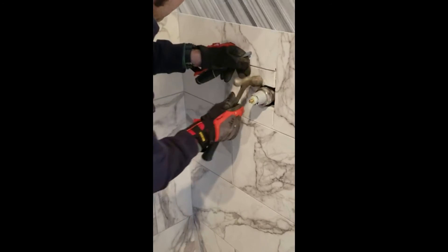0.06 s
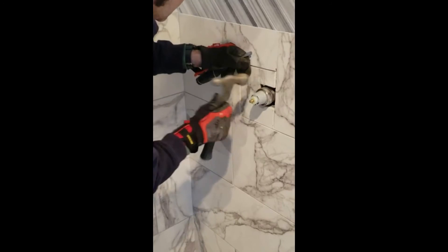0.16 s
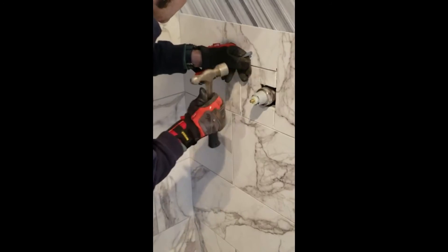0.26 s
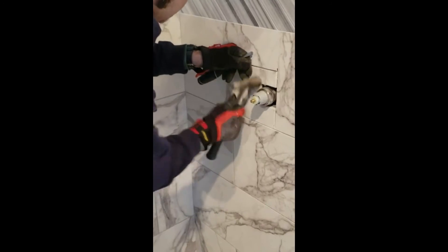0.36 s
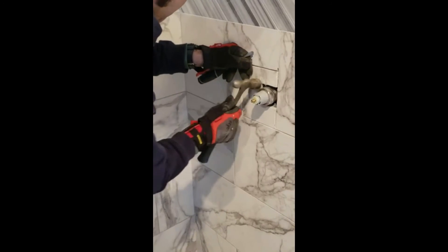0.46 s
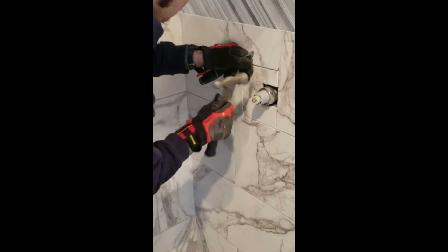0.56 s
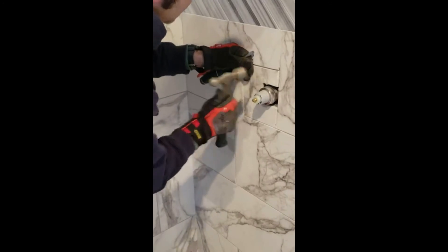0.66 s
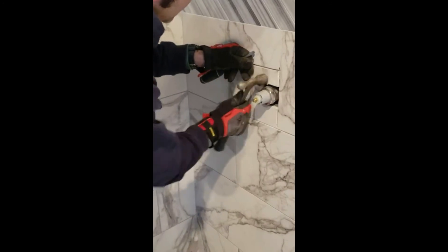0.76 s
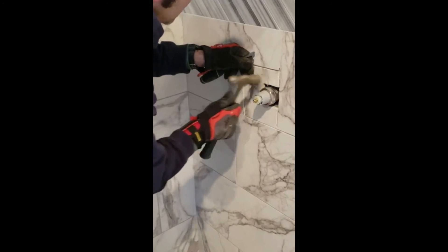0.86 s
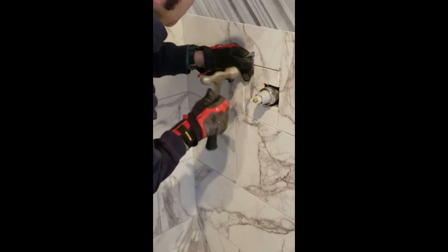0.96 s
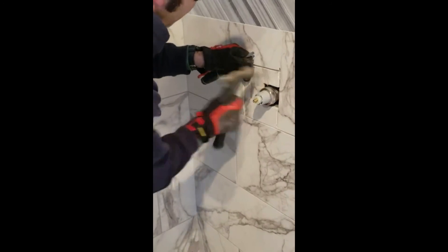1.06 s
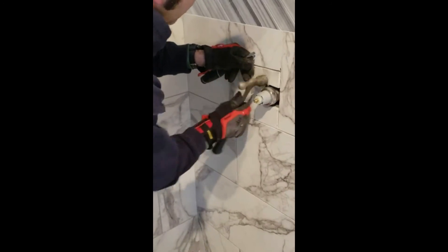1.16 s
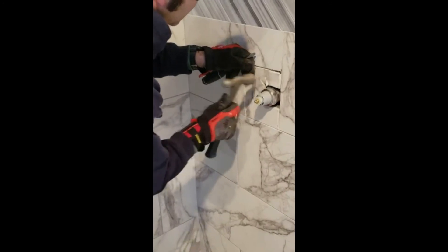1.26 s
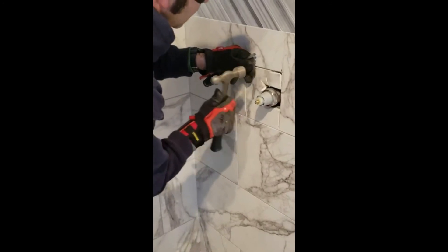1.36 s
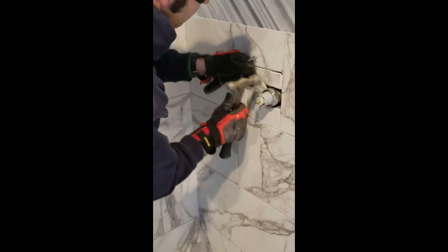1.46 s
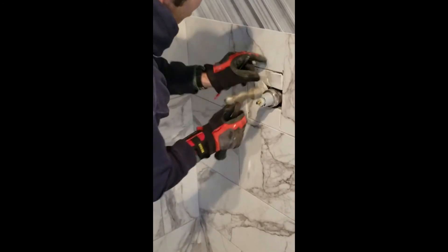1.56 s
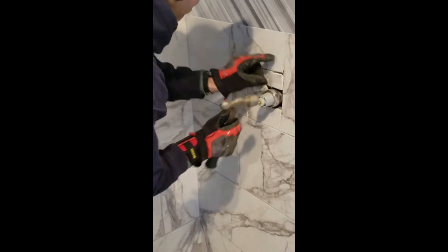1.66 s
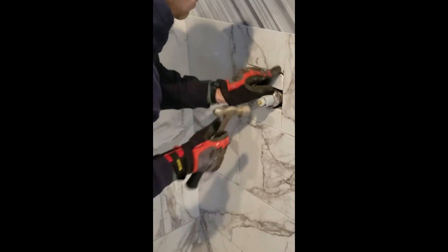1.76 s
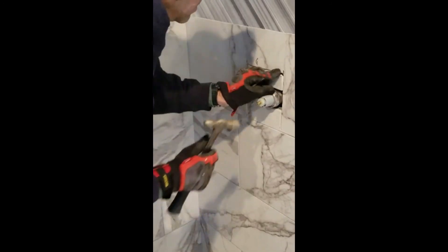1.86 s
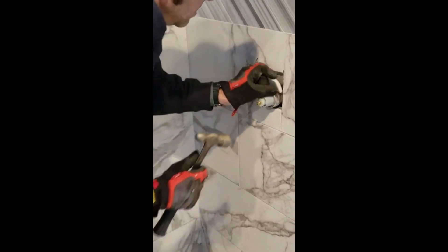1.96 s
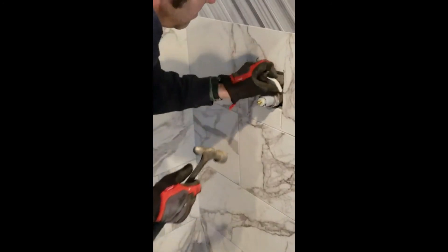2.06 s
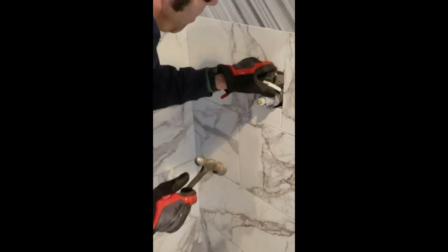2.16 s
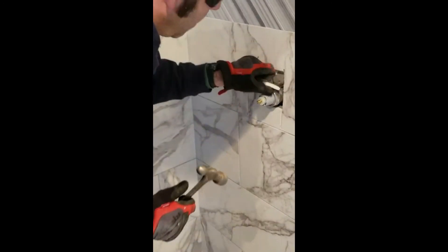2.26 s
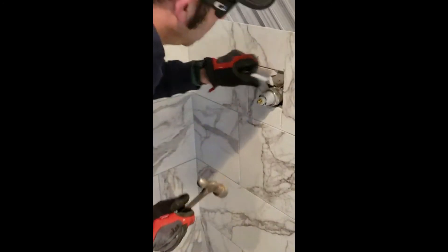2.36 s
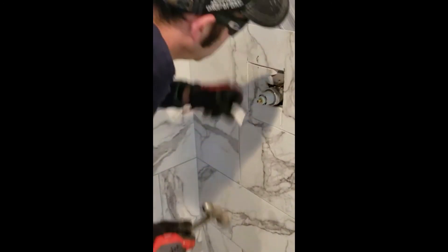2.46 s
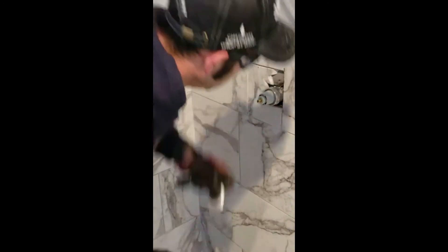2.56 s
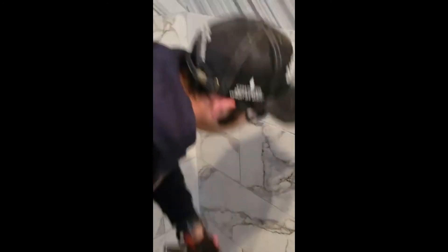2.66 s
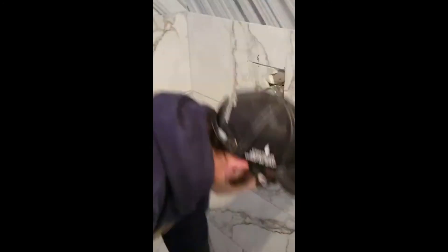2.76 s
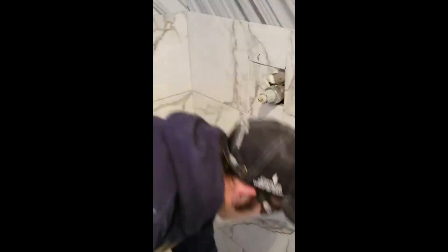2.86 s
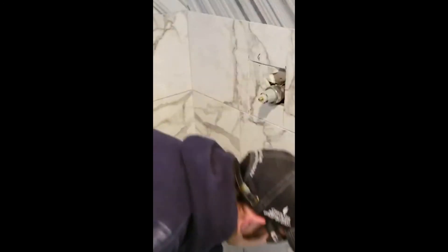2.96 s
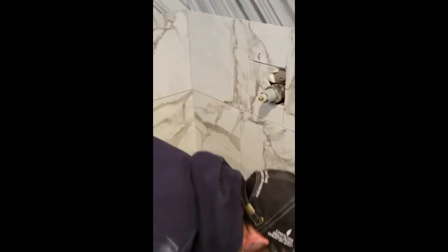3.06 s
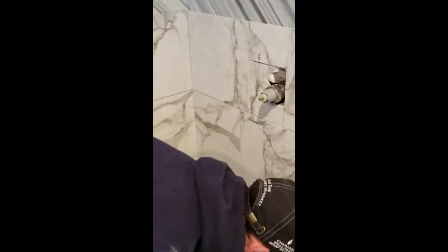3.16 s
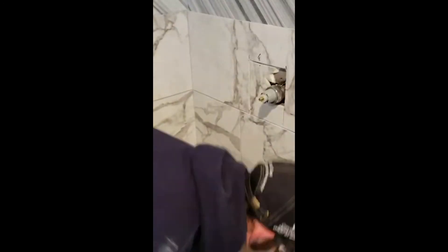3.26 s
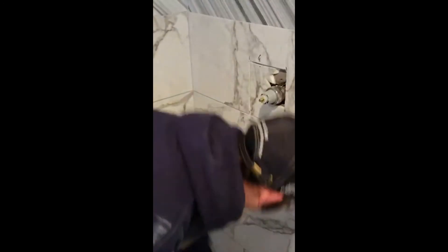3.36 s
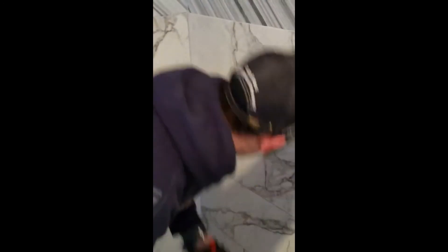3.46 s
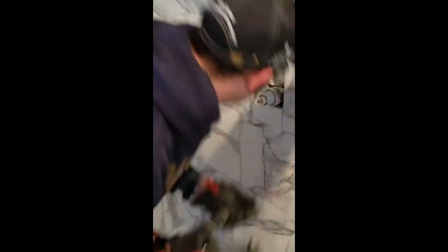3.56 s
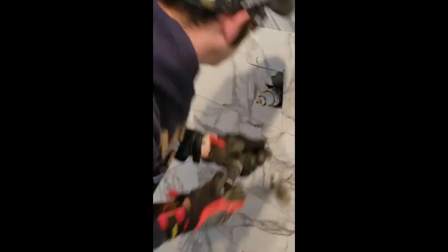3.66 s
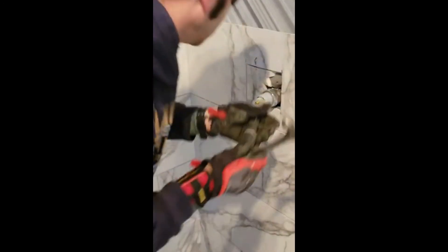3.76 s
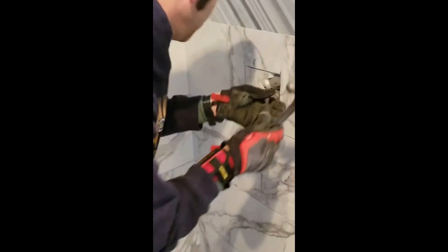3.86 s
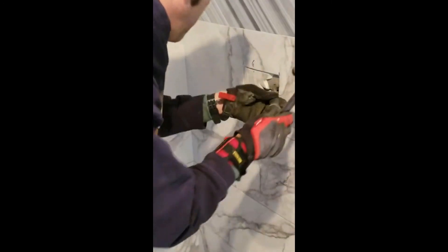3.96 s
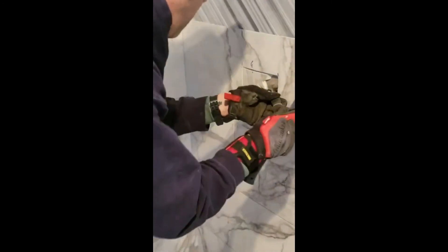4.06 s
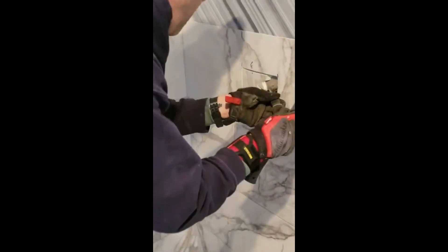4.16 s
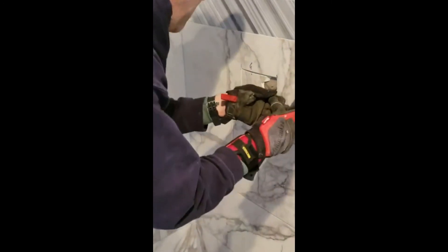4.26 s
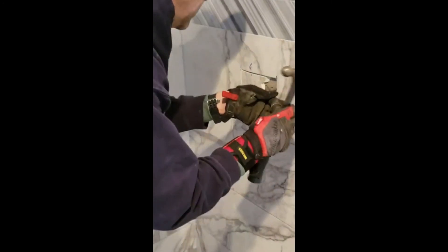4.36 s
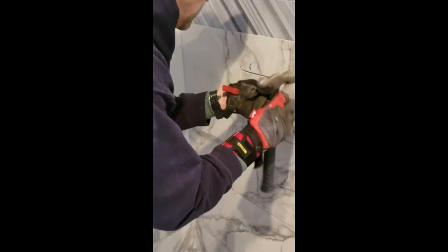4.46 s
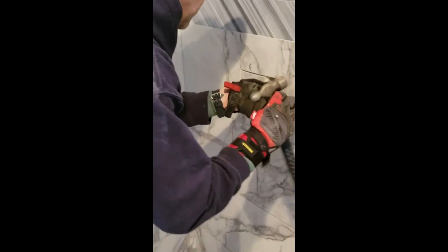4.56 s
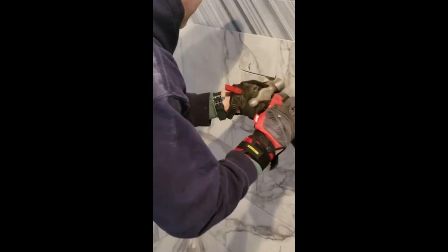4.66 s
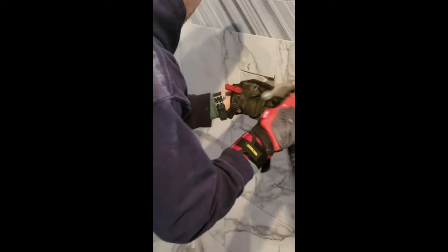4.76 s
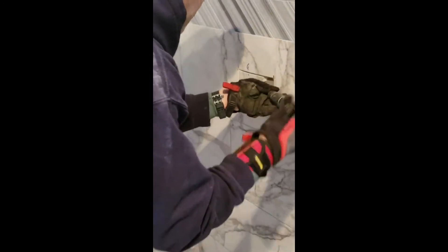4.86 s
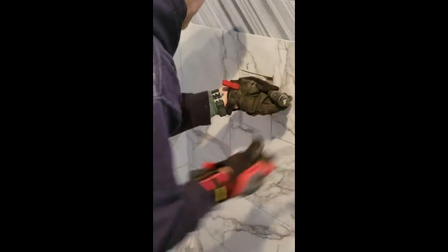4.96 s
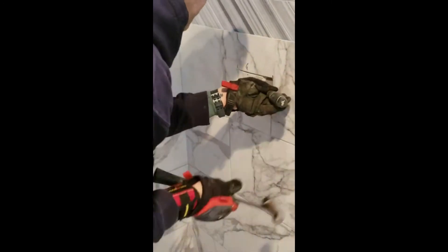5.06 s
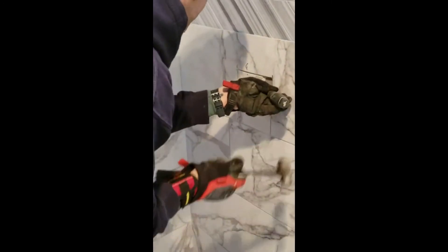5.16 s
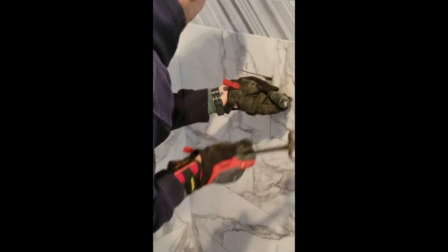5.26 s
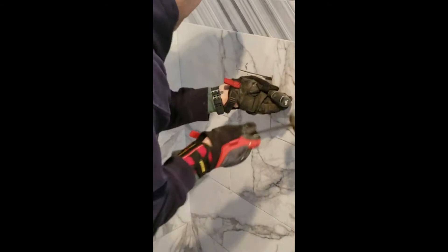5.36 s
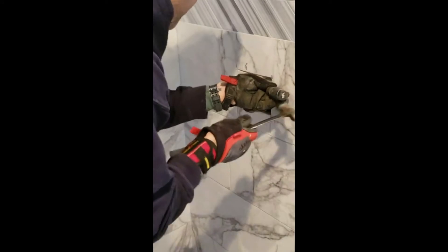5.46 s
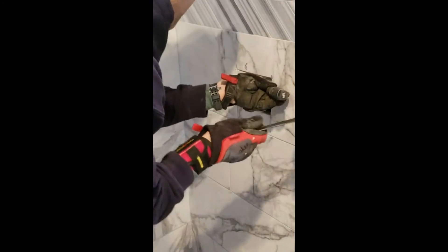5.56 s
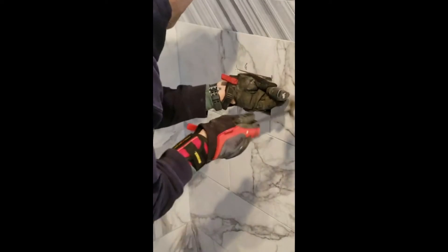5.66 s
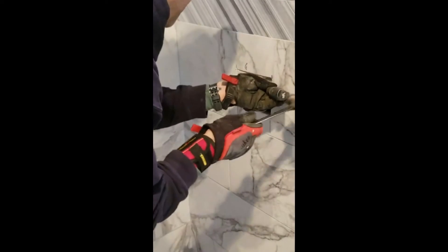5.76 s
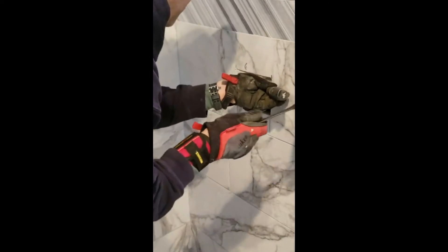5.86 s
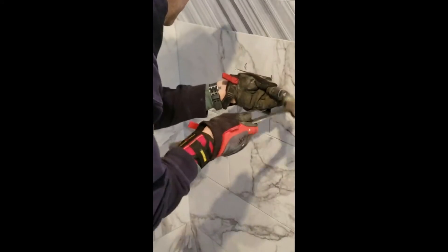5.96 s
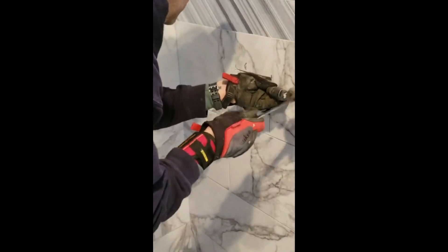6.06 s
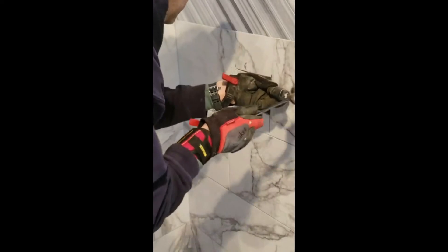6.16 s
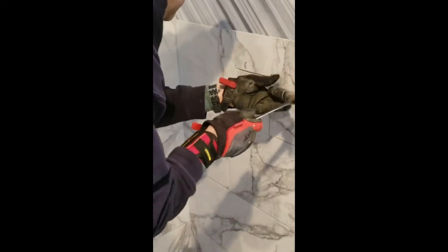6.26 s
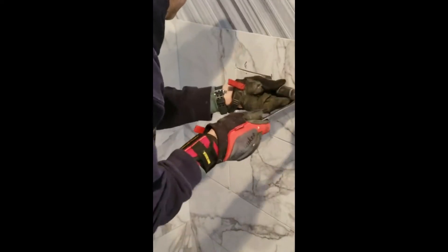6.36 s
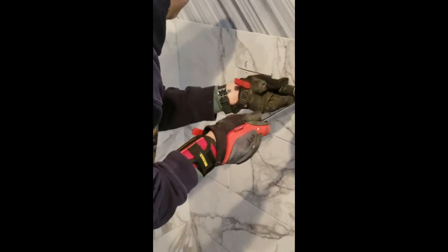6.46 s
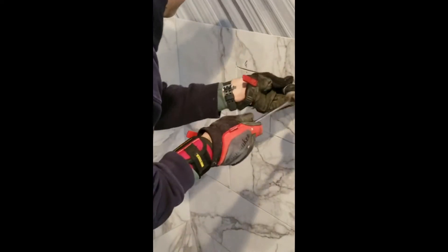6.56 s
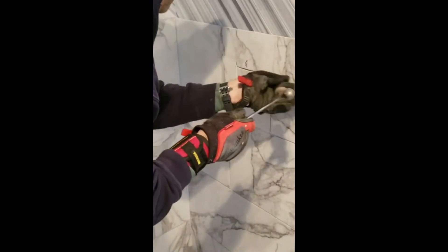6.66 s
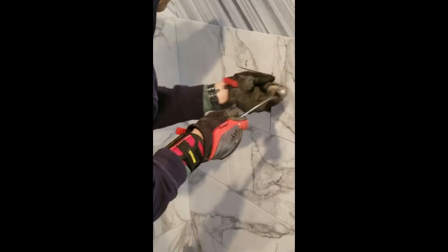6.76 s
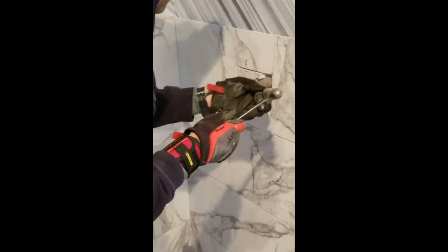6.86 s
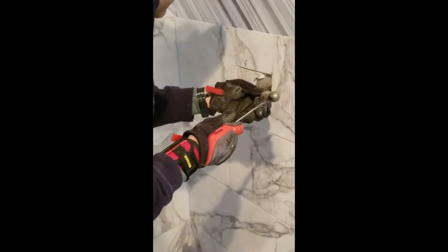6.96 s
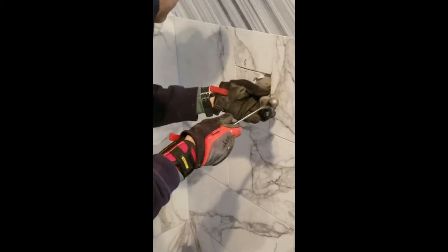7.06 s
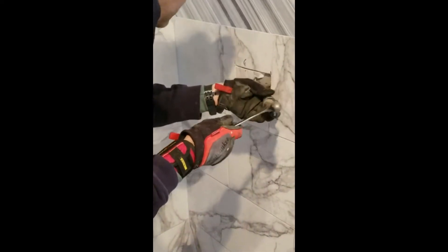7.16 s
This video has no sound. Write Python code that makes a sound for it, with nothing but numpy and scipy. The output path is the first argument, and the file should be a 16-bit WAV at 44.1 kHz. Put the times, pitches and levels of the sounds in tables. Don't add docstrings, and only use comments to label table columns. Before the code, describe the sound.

A close stereo microphone catches evenly spaced, loud chisel blows on wall tile, each sharp and gritty with a deep hollow boom and bright room reverberation. A pause brings falling chips, scraping gloves, soft bumps and a bouncing steel tool with a thin high ring. After tentative taps, quicker blows of varying strength sound looser and more resonant, ending in crisp chip cracks.

```python
import sys
import numpy as np
from scipy import signal
from scipy.io import wavfile
from scipy.ndimage import uniform_filter1d

SR = 44100
rng = np.random.default_rng(int(sys.argv[2]) if len(sys.argv) > 2 else 0)


def master_out(mix):
    frames = np.transpose(np.atleast_2d(mix))
    ceiling = np.clip(frames, -1, 1)
    pcm = np.round(ceiling * 32767).astype(np.int16)
    wavfile.write(sys.argv[1], SR, pcm)


def volts_from_decibels(level):
    exponent = np.asarray(level, float) / 20
    return 10 ** exponent


N = 317520
LEAD = SR // 2
STEP = 64

# (time [s], knock [dB], wall boom [dB], board [dB], tile pitch [Hz])
FIRST_RUN = [
    (-0.18, -10, -26, -23, 1300),
    (0.1165, -5.5, -19, -17, 1347),
    (0.4872, -6, -18.5, -17, 1298),
    (0.8415, -8.5, -18, -16.5, 1370),
    (1.2155, -8.5, -18, -17, 1187),
]
SECOND_RUN = [
    (5.483, -22.5, -36.5, -33.5, 1420),
    (5.783, -7, -17.5, -29, 1355),
    (6.042, -17.5, -30, -36, 1914),
    (6.046, -13.5, -17, -25, 1179),
    (6.295, -14, -18.5, -23, 1226),
    (6.633, -19, -32.5, -42, 1359),
]
# (time [s], knock [dB], board [dB], crack [dB], tile pitch [Hz])
TAPS = [
    (4.398, -44, -44.5, -63, 1434),
    (4.672, -34.5, -42.5, -54, 1388),
    (4.77, -43, -49, -36.5, 1464),
    (5.058, -56, -60, -33.5, 1286),
    (5.279, -61, -70, -47, 1613),
    (6.87, -42, -45, -38.5, 1530),
    (7.118, -45, -63, -32.5, 1232),
    (7.136, -38.5, -43.5, -33, 1325),
]
# (time [s], knock [dB], board [dB], crack [dB], wall boom [dB])
BUMPS = [
    (2.83, -59.5, -71, -54, -51),
    (2.913, -31.5, -44, -31, -32.5),
    (2.969, -38, -61.5, -33, -54.5),
    (3.845, -59, -78, -52, -45),
    (4.105, -33, -46, -38, -48.5),
    (4.135, -53.5, -38, -68, -22.5),
    (4.302, -72, -73, -66, -38),
    (5.433, -44, -63.5, -48, -69),
    (5.459, -59, -51, -55, -60),
    (6.448, -36.5, -45, -25, -46),
]
# (time [s], crack [dB], tick [dB])
CHIPS = [(0.843, -13, -16), (1.217, -26, -17), (1.9707, -40.5, -26), (1.9729, -33.5, -24.5),
         (1.978, -42, -31), (2.139, -49, -31), (2.144, -56, -41), (2.266, -51, -44.5), (2.272, -57, -39),
         (2.38, -57, -44), (2.436, -60, -44), (2.834, -41.5, -45), (3.167, -47, -60), (3.182, -47, -55.5),
         (3.224, -53, -50), (4.246, -58, -23), (4.589, -32.5, -49), (4.672, -31.5, -43), (4.771, -41, -53),
         (5.433, -47, -52), (6.043, -10, -9), (6.871, -50, -45), (7.118, -29, -30), (7.1414, -4.5, -27),
         (7.1429, -19, -5.5), (7.1448, -25, -16)]
# (time [s], thud [dB], clatter [dB])
DROP_BOUNCES = [(3.263, -33, -16.5), (3.268, -45, -14.5), (3.276, -31, -7), (3.2803, -36, -12),
                (3.289, -27.5, -43.5), (3.3, -25, -38), (3.398, -36, -18), (3.402, -36.5, -11),
                (3.409, -36, -24.5), (3.416, -30.5, -36), (3.486, -40, -39.5)]
# (time [s], level [dB])
CLINKS = [
    (3.2645, -27),
    (3.2914, -37.5),
    (3.4037, -23.5),
    (3.4426, -33),
]
# (peak [s], rise [s], fall [s], scrape [dB], rumble over scrape [dB])
SLIDES = [(1.945, 0.059, 0.091, -61, 1.5), (2.048, 0.044, 0.25, -46, -12), (2.12, 0.054, 0.055, -72, 11),
          (2.33, 0.22, 0.091, -66.5, -21), (2.431, 0.14, 0.17, -57.5, -5.5), (2.7, 0.21, 0.48, -80, 4.5),
          (2.919, 0.035, 0.16, -45.5, -2.5), (3.501, 0.24, 0.23, -50.5, -12), (4.128, 0.028, 0.21, -40, 3),
          (4.395, 0.033, 0.83, -53.5, 3), (4.683, 0.032, 0.25, -38, -7.5), (4.79, 0.043, 0.16, -44.5, -4),
          (5.08, .3, 0.11, -59.5, -9), (5.294, 0.026, 0.83, -60, 2), (6.458, 0.022, 0.42, -39.5, -25),
          (6.645, .03, 0.17, -31.5, -7.5), (6.877, 0.014, 0.13, -41, -10), (7.137, 0.014, 0.13, -35, -16)]
# (peak [s], rise [s], fall [s], level [dB])
RUSTLES = [(1.985, 0.0066, 0.19, -61), (2.18, 0.34, 0.44, -70.5), (2.431, 0.26, 0.054, -67),
           (2.917, 0.13, 0.12, -54), (3.195, 0.87, 0.15, -61.5), (3.7, 0.83, 0.48, -57.5),
           (4.148, .12, .08, -72.5), (4.244, .007, 0.3, -57.5), (4.628, 0.31, 0.15, -48.5),
           (4.918, 0.11, .2, -39), (5.292, 0.107, 1, -59), (6.456, 0.01, 0.31, -36.5),
           (6.637, 0.057, 0.054, -28.5), (6.7, 0.092, 0.1, -51.5), (6.878, .04, .25, -71.5),
           (7.12, 0.0041, 0.03, -27), (7.149, .006, .06, -23)]

# (frequency [Hz], t60 [s], level [dB])
WALL = [
    [(43, 1, -19), (77, 1.1, -15.5), (123.7, 0.36, -2.5), (150.9, 0.83, -1.5), (178.55, 0.55, 2.5),
     (187, 0.21, -11), (212, .5, -8)],
    [(42, 1.3, -22), (67.2, 0.88, -20), (117.3, 0.36, -6.5), (155.2, 0.72, -8.5), (171.8, 0.46, -6.5),
     (178, 0.82, -1), (220, 1.5, -16.5)],
]
# (frequency [Hz], t60 [s], level [dB])
BOARD = [(258.1, .4, -23), (245, 0.13, -3.5), (351.6, 0.2, 2), (329.5, 0.27, -12.5), (400, 0.39, -5.5),
         (444.7, 0.5, 4.5), (521.4, 0.77, -7.5), (504, 0.65, -2)]
# (frequency [Hz], level [dB], t60 [s])
LOOSE_BOARD = [(248, -1, .35), (285, -3, .25), (318, -1, .3), (341, 0, .3), (385, -6, .25), (433, -1, .3),
               (520, -5, .3), (668, -5, .25), (810, -5, .2), (930, -6, .2)]
# (share of tile pitch [ratio], level [dB])
TILE_MODES = [
    [(1.0, 1), (1.25, -3.5), (1.48, 4), (1.9, -9.5), (2.45, -6.5), (3.2, -8)],
    [(.62, -12), (.78, -5.5), (.9, -4.5), (1.0, 2.5), (1.1, -6.5), (1.4, -11)],
]
TILE_T60_S = [.025, .06]
# (tick [dB], crack [dB], tile ring [dB])
FOLLOWS = [
    (-29, -7, -3),
    (-20.5, -8.5, 7.5),
]
# (step [dB], slope [dB/s])
DAMPING = [
    (-1.5, -9.5),
    (-6.5, -61),
]
# (frequency [Hz], t60 [s], level [dB])
STEEL = [(14995, .17, 0), (14970, .12, -7), (15045, .05, -6)]

# (frequency [Hz], level [dB])
THUD = [(80, -36.5), (250, 4), (400, 9), (600, -3.5), (900, -9), (2000, -35.5)]
KNOCK = [(300, -40.5), (650, -0.5), (1000, -1.5), (1300, -1.5), (1900, -9), (2800, -11), (4500, -23),
         (9000, -46.5)]
CRACK = [(1200, -68.5), (2800, -6), (4300, 6.5), (5500, 8), (6600, 9.5), (8500, -2), (12000, -1),
         (16000, -13.5)]
TICK = [(5000, -43), (8500, -33), (10500, 3.5), (13000, 39.5), (15500, 0)]
CHIP = [(1200, -40.5), (2500, -22.5), (4200, -8), (5600, -1), (6700, 3), (7800, -9.5), (9500, -13),
        (16000, -28.5)]
CHIP_TICK = [(6000, -35), (9500, -8), (12000, -2), (14000, 0), (16000, 2)]
CLATTER = [(900, -25), (2000, -7.5), (3000, -6.5), (4300, 1), (5300, -8), (6500, -2), (8000, -14.5),
           (13000, -26.5)]
# (frequency [Hz], level [dB])
SCRAPE = [(300, -13), (700, 5), (1100, 7.5), (1600, 10.5), (2100, 2), (2600, -2.5), (4000, -3), (7000, -21)]
RUSTLE = [(2000, -9), (4500, 3.5), (7000, 5.5), (9000, -3.5), (12000, 6), (15500, 1.5)]
RUMBLE = [(60, -22), (120, 27), (180, 1), (400, 3), (700, -33.5)]
# (frequency [Hz], t60 [s])
ROOM = [(100, 0.83), (300, 0.71), (750, 0.72), (2000, 0.55), (5000, 0.53), (9000, 0.36), (14000, 0.33)]
# (frequency [Hz], correlation [-1..1])
SAME = [(25, 0.98), (150, 0.87), (300, .75), (600, .1), (1400, -0.18), (4000, 0.033)]
# (frequency [Hz], density [dB/Hz])
BACKGROUND_NOISE = [(12, -31), (20, -4), (44, -2.5), (65, -36), (128, -9.5), (179, -36.5), (634, -42.5),
                    (1900, -29.5), (2440, -32.5), (7300, -28.5), (8650, -32.5), (13900, -31.5), (15200, -41.5),
                (16500, -38)]
# (frequency [Hz], level [dB])
HUM = (121, -71)
# (frequency [Hz], gain [dB])
TREBLE_END = [(10, 0), (15600, 0.5), (16000, -23), (16900, -29), (17400, -85.5)]


def hammer_run(rows, spot, **settings):
    tick_db, crack_db, _ = FOLLOWS[spot]
    events = [(s, knock, boom, board, knock + crack_db, knock + tick_db)
              for s, knock, boom, board, hz in rows]
    return hits(events, spot, (THUD, KNOCK, CRACK, TICK), [0, 0, 0, 0], **settings)


def tile_rings():
    glance = .55
    tap_ring_db = 16
    tile = np.zeros(N + LEAD)
    runs = ((FIRST_RUN, 0, FOLLOWS[0][2]), (SECOND_RUN, 1, FOLLOWS[1][2]), (TAPS, 1, tap_ring_db))
    for rows, spot, ring_db in runs:
        for s, knock, body, _, hz in rows:
            modes = [(share * hz, TILE_T60_S[spot], db) for share, db in TILE_MODES[spot]]
            level_db = knock + ring_db + glance * (knock - body)
            add(tile, s, volts_from_decibels(level_db) * ring(modes, rise_s=.0004, size=5000))
    direct = np.array([tile, np.roll(tile, 14)])
    return (direct + volts_from_decibels(-9.5) * in_room(tile[None]))[:, LEAD:]


def light_contacts():
    boom_over_board_db, tick_over_crack_db = 12.5, -12
    events = [(s, knock, board + boom_over_board_db, board, crack, crack + tick_over_crack_db)
              for s, knock, board, crack, hz in TAPS]
    events += [(s, knock, boom, board, crack, crack + tick_over_crack_db)
               for s, knock, board, crack, boom in BUMPS]
    return hits(events, 1, (THUD, KNOCK, CRACK, TICK), [0, 0, 0, 0], grit_s=.0041, grit_db=-.5,
                wet_db=7, boom_db=-14, board_db=9.5, lag=-4)


def chips():
    events = [(s, -120, -120, -120, crack, tick) for s, crack, tick in CHIPS]
    return hits(events, 1, (THUD, KNOCK, CHIP, CHIP_TICK), [-3, -1, 1.5, 10.5], grit_s=.0018, grit_db=4,
                wet_db=-1.5, boom_db=-.5, board_db=-2, lag=-5)


def dropped_tool():
    boom_over_thud_db, board_over_thud_db, tick_over_clatter_db = -22.5, -11, -45.5
    events = [(s, thud, thud + boom_over_thud_db, thud + board_over_thud_db,
               clatter, clatter + tick_over_clatter_db) for s, thud, clatter in DROP_BOUNCES]
    return hits(events, 0, (THUD, KNOCK, CLATTER, TICK), [0, 0, 0, 0], grit_s=.0022, grit_db=7.5,
                wet_db=4, boom_db=-2, board_db=0, lag=-7)


def tool_ring():
    tool = np.zeros(N + LEAD)
    for s, db in CLINKS:
        add(tool, s, volts_from_decibels(db) * ring(STEEL, rise_s=.001, size=20000))
    return (tool * volts_from_decibels([[0], [-3]]) + volts_from_decibels(-1) * in_room(tool[None]))[:, LEAD:]


def movement():
    slips = volts_from_decibels(2.2 * evened(uniform_filter1d(rng.standard_normal(N), size=150)))
    slides = np.array([swell(*row[:4]) for row in SLIDES])
    scrape = slides.sum(0)
    rustle = sum(swell(*row) for row in RUSTLES)
    rumble = volts_from_decibels([row[4] for row in SLIDES]) @ slides
    sound = np.zeros((2, N))
    for level, colour in ((scrape, SCRAPE), (rustle, RUSTLE), (rumble, RUMBLE)):
        envelope = uniform_filter1d(np.repeat(level, STEP)[:N], size=400)
        sound += envelope * hiss(colour, .97, size=512)
    return slips * sound


def swell(peak_s, rise_s, fall_s, db):
    t = np.arange(0, N, STEP) / SR - peak_s
    return volts_from_decibels(db - 21 * np.maximum(-t / rise_s, t / fall_s))


def background():
    t = np.arange(N) / SR
    waver = evened(uniform_filter1d(rng.standard_normal(N), size=4000))
    hum_hz, hum_db = HUM
    hum = volts_from_decibels(hum_db + 1.5 * waver) * np.sin(2 * np.pi * hum_hz * t)
    return volts_from_decibels(-68.5) * hiss(BACKGROUND_NOISE, 1.2, size=4096) + hum


def hits(events, spot, colours, part_db, grit_s, grit_db, wet_db, boom_db, board_db, lag):
    clean, near, boom = np.zeros((3, N + LEAD))
    step_db, slope_db = DAMPING[spot]
    late_s = np.maximum(np.arange(SR) / SR - .066, 0)
    damped = volts_from_decibels(step_db * np.minimum(late_s / .012, 1) + slope_db * late_s)
    boards = BOARD, [(hz, t60, db) for hz, db, t60 in LOOSE_BOARD]
    wall = damped * ring(WALL[spot], rise_s=.0091)
    board = damped * ring(boards[spot], rise_s=.001)
    parts = np.array([snap(colour) for colour in colours])
    grit_decay = np.exp(-np.arange(800) / SR / grit_s)
    for s, knock, low, mid, crack, tick in events:
        click = volts_from_decibels(np.add([mid, knock, crack, tick], part_db)) @ parts
        grit = rng.standard_normal(800) * grit_decay
        grit /= np.linalg.norm(grit)
        add(clean, s, click)
        add(near, s, volts_from_decibels(grit_db) * signal.fftconvolve(click, grit))
        add(boom, s, volts_from_decibels(low + boom_db) * wall + volts_from_decibels(mid + board_db) * board)
    direct = np.array([clean + near, np.roll(clean + near, lag)])
    wet = in_room(clean[None] + .067 * near + .069 * boom)
    return (direct + volts_from_decibels(wet_db) * wet + boom)[:, LEAD:]


def ring(modes, rise_s, size=SR):
    t = np.arange(size) / SR
    sound = np.zeros(size)
    for k, (hz, t60, db) in enumerate(modes):
        sound += (-1) ** k * volts_from_decibels(db - 60 * t / t60) * np.sin(2 * np.pi * hz * t)
    sound *= 1 - np.exp(-t / rise_s)
    return sound / abs(sound).max()


def snap(colour):
    log_gain = np.log(volts_from_decibels(read(colour, abs(np.fft.fftfreq(4096, 1 / SR)))))
    click = np.fft.ifft(np.exp(np.conj(signal.hilbert(log_gain)))).real[:1500]
    return click / abs(click).max()


def room():
    taps = rng.choice([-1., 1.], (2, SR)) * (rng.random((2, SR)) < .15)
    hz, t, z = signal.stft(taps, SR, nperseg=512, noverlap=384)
    z = pair(*z, hz) * volts_from_decibels(-60 * t / read(ROOM, hz)[:, None])
    tail = signal.istft(z, SR, nperseg=512, noverlap=384)[1]
    tail *= np.clip(np.arange(tail.shape[1]) / SR / .00032 - 1, 0, 1)
    return tail / np.linalg.norm(tail[0])


def in_room(sound):
    return signal.fftconvolve(sound, room(), axes=1)[:, :N + LEAD]


def hiss(colour, patchy_db, size):
    hz, hop = np.fft.rfftfreq(size, 1 / SR), size // 4
    a, b, c, d, patches = rng.standard_normal((N // hop + 5, len(hz), 5)).T
    patches = uniform_filter1d(patches, size=8, axis=0)
    patches = evened(uniform_filter1d(patches, size=12, axis=1))
    gain = volts_from_decibels(read(colour, hz)[:, None] + patchy_db * patches)
    z = pair(a + 1j * b, c + 1j * d, hz) * gain
    return evened(signal.istft(z, nperseg=size, noverlap=size - hop)[1][:, :N])


def pair(left, other, hz):
    same = np.clip(read(SAME, hz), -1, 1)[:, None]
    return np.array([left, same * left + np.sqrt(1 - same ** 2) * other])


def read(points, hz):
    f, value = np.transpose(points)
    return np.interp(np.log(hz + 1), np.log(f + 1), value)


def evened(x):
    return x / np.sqrt(np.mean(x ** 2) + 1e-20)


def add(mix, s, sound):
    part = mix[LEAD + round(s * SR):][:len(sound)]
    part += sound[:len(part)]


def scene():
    mix = hammer_run(FIRST_RUN, 0, grit_s=.0063, grit_db=6, wet_db=10.5, boom_db=3.5, board_db=-1, lag=26)
    mix += hammer_run(SECOND_RUN, 1, grit_s=.011, grit_db=1, wet_db=11, boom_db=11.5, board_db=13.5, lag=12)
    mix += tile_rings() + light_contacts() + chips()
    mix += dropped_tool() + tool_ring()
    return mix + movement() + background()


def low_pass(x):
    return signal.sosfilt(signal.butter(12, 16820, fs=SR, output="sos"), x)


def record(dry):
    treble_end = snap(TREBLE_END)
    rounded = .95 * np.tanh(dry / .95)
    heard = signal.oaconvolve(rounded, treble_end[None] / treble_end.sum(), axes=1)[:, :N]
    return low_pass(heard)


dry = scene()
out = record(dry)
master_out(out)
```